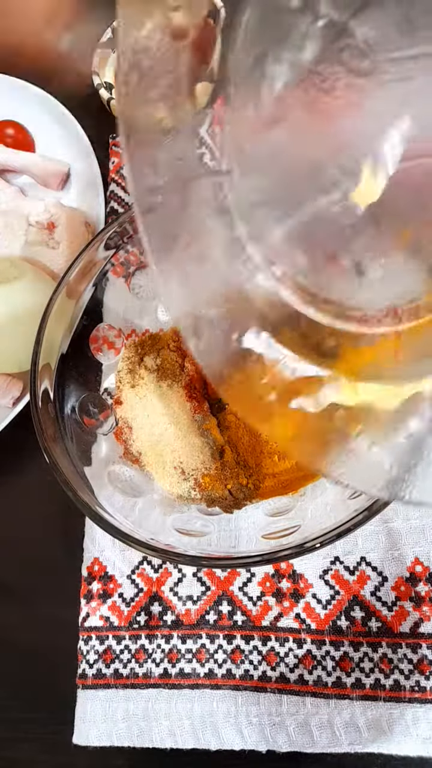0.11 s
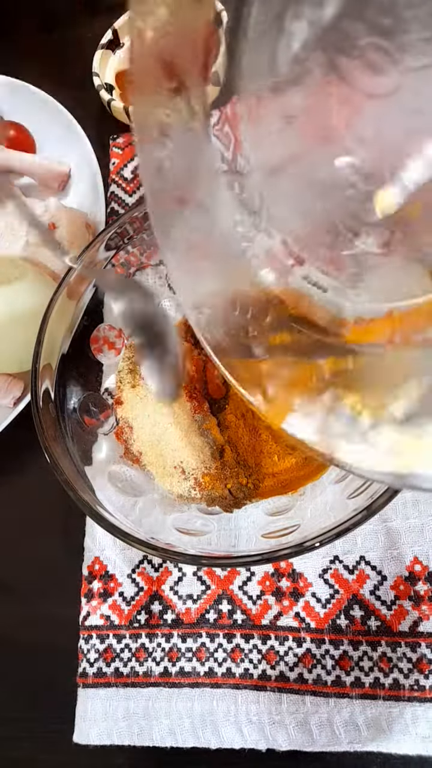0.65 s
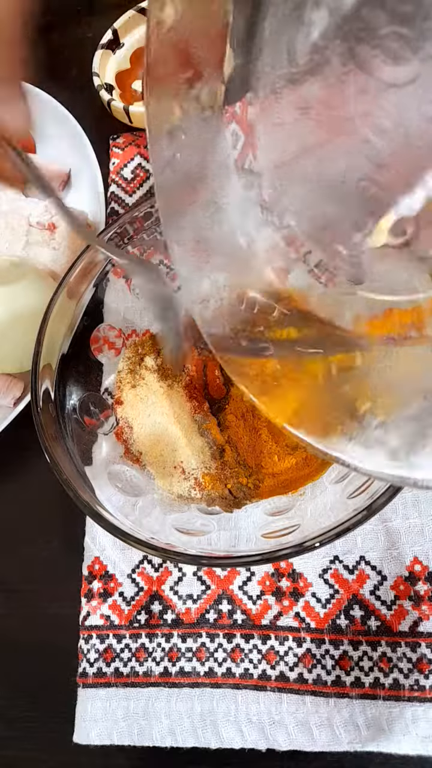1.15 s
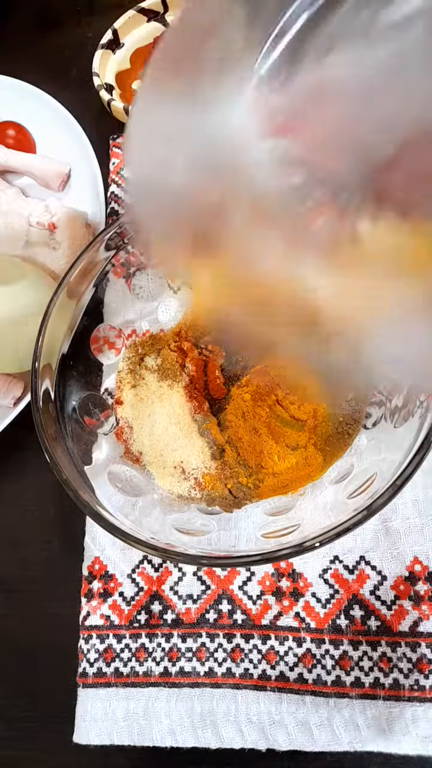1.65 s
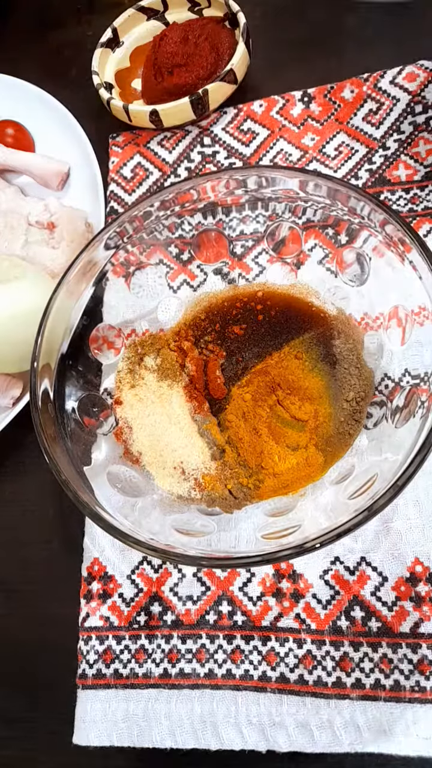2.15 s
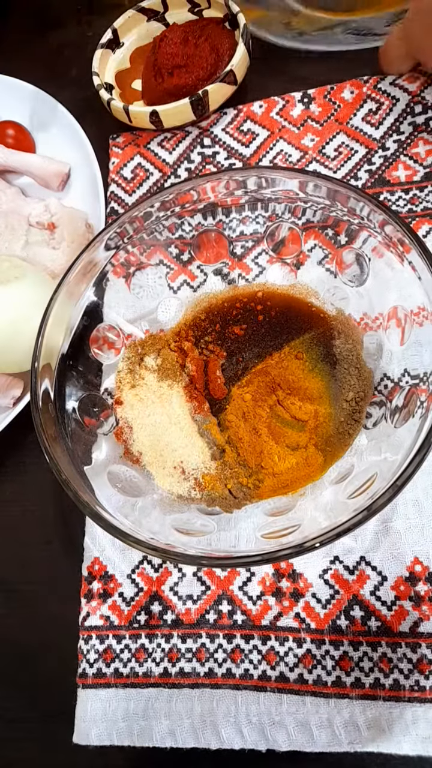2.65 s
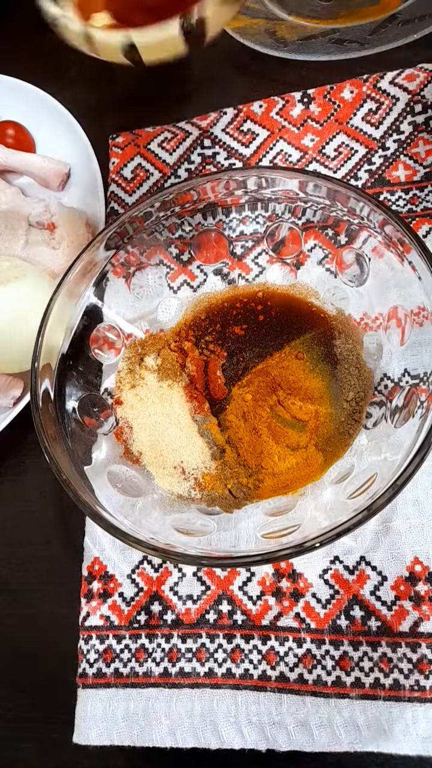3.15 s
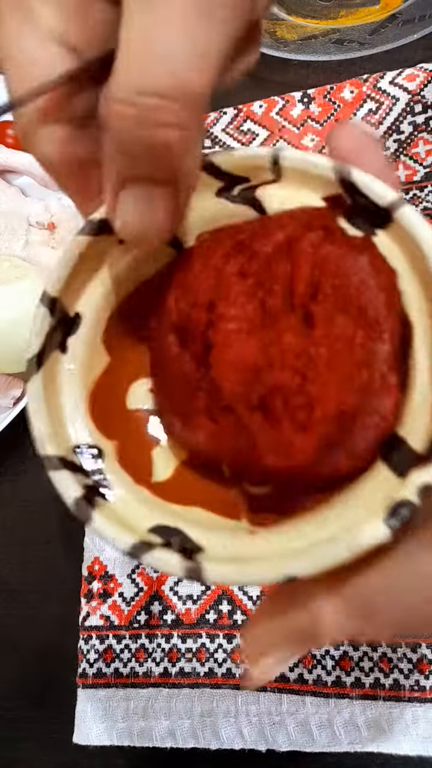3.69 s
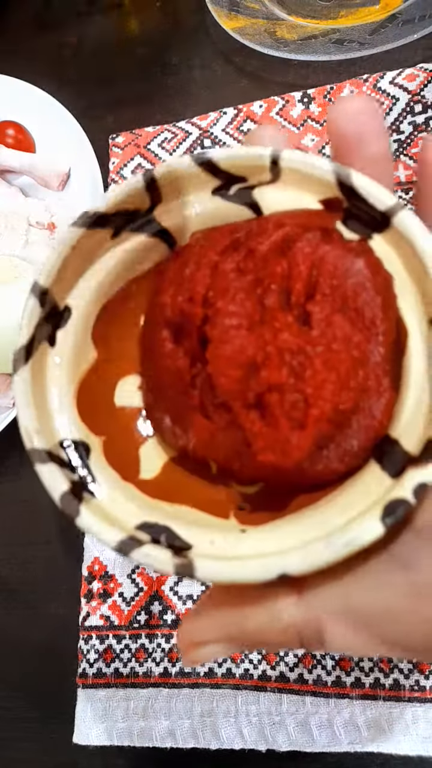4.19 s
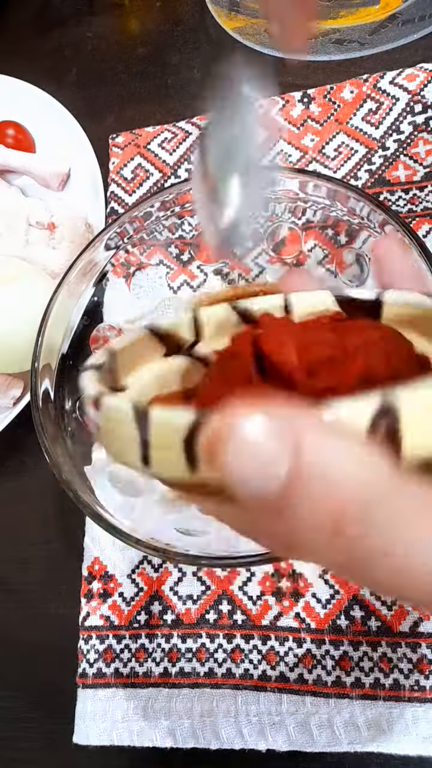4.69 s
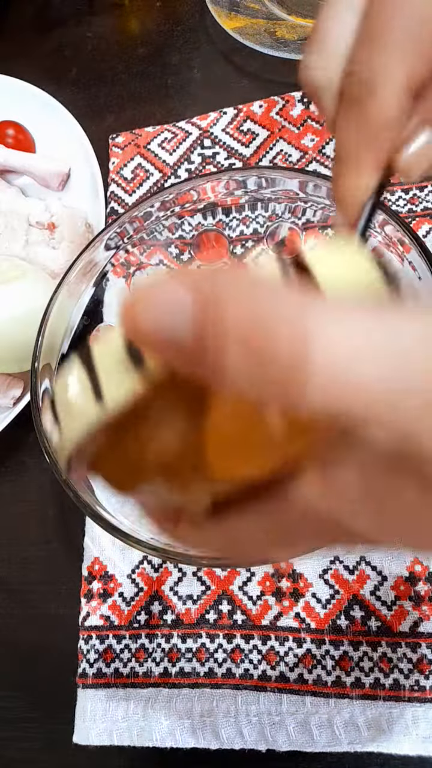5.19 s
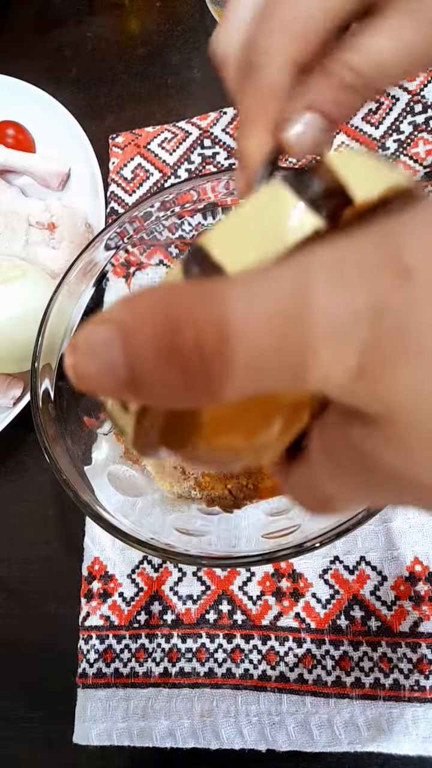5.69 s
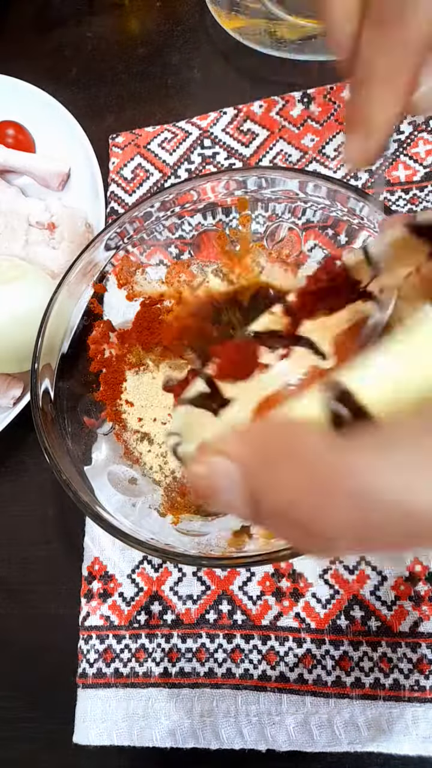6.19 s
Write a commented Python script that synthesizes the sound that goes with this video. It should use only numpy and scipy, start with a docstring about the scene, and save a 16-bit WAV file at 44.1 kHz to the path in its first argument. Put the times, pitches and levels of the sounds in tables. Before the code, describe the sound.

Very close to a phone microphone, a metal spoon strikes a held glass bowl in loud, irregular, bright clinks with steely cracks and small puffs of air. The bowl then lands and rocks on a wooden table with dull knocks and a thin glassy ring. After a near-silent pause, the spoon knocks, ticks and scrapes softly on a small glazed dish, ending with a quick cluster of harder knocks. A hard-walled kitchen answers briefly.

```python
"""A steel spoon taps a hand-held glass bowl close to a phone, the bowl is set down rocking on a wooden table,
then the spoon scrapes and knocks a small glazed dish. Each blow is a bank of decaying sines plus a noise crack,
answered by the noise tail of a hard-walled kitchen. Filtered noise makes the scrape, the ticks, a faint low
rumble, a narrow whine and the hiss; sines make the long free rings and the low puffs of air."""
import sys
import numpy as np
from scipy import signal
from scipy.fft import rfft, irfft, next_fast_len
from scipy.io import wavfile
from scipy.ndimage import uniform_filter1d

SR = 44100
rng = np.random.default_rng(int(sys.argv[2]) if len(sys.argv) > 2 else 0)


def materialize(psi):
    """Save the field psi as 16-bit PCM at rate SR to the path in sys.argv[1].

    A 1-D psi becomes a single channel; in a 2-D psi each row is a channel.
    """
    bounded = np.clip(np.atleast_2d(psi).T, -1, 1)
    quanta = np.round(bounded * 32767).astype(np.int16)
    wavfile.write(sys.argv[1], SR, quanta)


def natural_amplitude(level_db):
    """Convert a level in decibels to a linear amplitude factor, elementwise."""
    exponent = np.asarray(level_db, float) / 20
    return 10 ** exponent


N = 279153
LEAD = SR // 4  # samples that each track starts early, for sounds begun before time zero

# contact noise of steel on a hard surface, relative spectrum: freq_hz, density_db (dB per Hz)
CRACK = [(90, -38.5), (200, -15.5), (1100, 3), (2300, -6), (3700, -7.5), (6000, -4), (16000, -23)]
# glass modes that the grip hardly damps: pitch_hz, level_db (relative)
GLASS_FREE = [(2045, -27), (3187, -24.5), (4260, -32), (4868, -32), (5470, -31.5), (6065, -31.5),
              (7266, -25)]
# dish modes, before damping and weighting: pitch_hz, width_hz, level_db (relative)
DISH = [(1635, 90, -1.75), (1810, 120, 0.8), (2534, 41, -8), (3200, 100, -15), (4360, 90, 1),
        (5500, 47, -10.5), (7450, 51, -2.5), (9206, 55, -14), (11600, 42, -16), (12800, 45, -17.5)]


def unit(x):
    """Bring to rms 1."""
    return x / np.sqrt(np.mean(x ** 2) + 1e-20)


def along(points, hz):
    """Read (Hz, value) points on a log frequency axis."""
    f, v = np.transpose(points)
    return np.interp(np.log(hz + 1), np.log(f + 1), v)


def curve(rows, column=1):
    """Draw one column of timed levels as one dB value per sample, -120 dB outside the rows."""
    rows = np.array(rows)
    return np.interp(np.arange(N) / SR, rows[:, 0], rows[:, column], left=-120, right=-120)


def filtered(x, response):
    """Multiply the spectrum of x by a response of frequency."""
    n = x.shape[-1]
    m = next_fast_len(n + 4096)
    return irfft(rfft(x, m) * response(np.fft.rfftfreq(m, 1 / SR)), m)[..., :n]


def causal(x, colour_db):
    """Pass x through a minimum-phase filter, so nothing sounds before the blow."""
    n = x.shape[-1]
    m = 2 * next_fast_len(n)
    response_db = np.maximum(colour_db(np.fft.rfftfreq(m, 1 / SR)), -90)
    cepstrum = irfft(np.log(natural_amplitude(response_db)), m)
    # folding the cepstrum onto positive time gives minimum phase
    cepstrum[1:m // 2] *= 2
    cepstrum[m // 2 + 1:] = 0
    return irfft(rfft(x, m) * np.exp(rfft(cepstrum)), m)[..., :n]


def paired(two, alike):
    """Mix two unrelated signals to left and right with a given likeness per frequency."""
    def mid_side_gains(hz):
        angle = np.arccos(np.clip(along(alike, hz), 0, 1)) / 2
        return np.array([np.cos(angle), np.sin(angle)])

    mid, side = filtered(two, mid_side_gains)
    return np.array([mid + side, mid - side])


def add(track, s, sound):
    """Lay a stereo sound, starting 0.6 ms after its listed time, on a track that starts LEAD samples early."""
    part = track[:, LEAD + round((s + .0006) * SR):][:, :sound.shape[1]]
    part += sound[:, :part.shape[1]]


def singing(modes, t, t60, spot, wander):
    """Thin lines under the blow whose phase wanders at random, slightly widening each pitch."""
    hz, level = np.transpose(modes)[:, :, None]
    chance_db = 2 * rng.standard_normal((2, len(hz), 1))  # each port catches its own share
    phase = wander * np.cumsum(rng.standard_normal((len(hz), len(t))), axis=1)
    lines = natural_amplitude(level + spot(hz) + chance_db - 60 * t / t60) * np.sin(2 * np.pi * hz * t + phase)
    return lines.sum(1)


def blows(events, modes, free, contact, crack_db, crack_t60, crack_room_db, damping,
          free_db, free_t60, favour_db, pan_db, lag, wander):
    """Each blow rings damped modes at new strengths, cracks, and wakes the room."""
    shade_db, shade_hz = 7, 6000  # the phone's body hides the right port: dB per octave, well above shade_hz
    track, direct = np.zeros((2, 2, LEAD + N))
    t = np.arange(SR // 2) / SR
    hz, width, level = np.transpose(modes)[:, :, None]
    decay = np.exp(-np.pi * width * damping * t)
    swell = 1 - np.exp(-t / 0.0013)  # the blow takes a moment to spread through the wall
    for s, db, tilt_db, spot_hz, room_db in events:
        def spot(f):
            favoured = np.exp(-(np.log2(f / spot_hz) / 0.14) ** 2)
            return tilt_db * np.log2(f / 3000) + favour_db * favoured

        def crack_colour(f):
            return along(contact, f) + tilt_db * np.log2(f / 3000 + 0.0048)

        chance_db = 1.8 * rng.standard_normal((3, len(hz), 1))  # strength, then what each port catches
        rings = width * natural_amplitude(level + spot(hz) + chance_db[0]) * decay * np.sin(2 * np.pi * hz * t)
        ring = (natural_amplitude(chance_db[1:]) * rings).sum(1) * swell
        free_ring = natural_amplitude(free_db) * swell * singing(free, t, free_t60, spot, wander)
        ring = ring / np.abs(ring).max() + free_ring

        burst = natural_amplitude(-60 * t / crack_t60) * (1 - np.exp(-t / 0.0001)) * rng.standard_normal(len(t))
        crack = causal(burst, crack_colour)
        crack *= natural_amplitude(crack_db) / np.abs(crack).max()

        near = natural_amplitude(db) * (ring + crack)
        sent = natural_amplitude(db) * (ring.mean(0) + natural_amplitude(crack_room_db) * crack)  # the room gets less of the crack
        add(track, s, natural_amplitude(room_db) * signal.fftconvolve(sent[None], kitchen(), axes=1))
        near[1] = np.pad(near[1], (lag, 0))[:len(t)]  # the left port is nearer
        add(direct, s, near * natural_amplitude([[pan_db / 2], [-pan_db / 2]]))
    direct[1] = causal(direct[1], lambda f: -shade_db * np.log2(1 + (f / shade_hz) ** 2) / 2)
    return (track + direct)[:, LEAD:]


def glass_taps():
    """The spoon strikes the held bowl: bright glass modes, damped by the grip, under a steel crack."""
    # spoon on glass: start_s, level_db, tilt_db (per octave), favoured_hz (by the spot struck), room_db
    tap_rows = [(-0.1, -10, 0.5, 3300, 2.5), (0.1607, -2, 0.5, 2970, -14), (0.1645, -3.5, 2.5, 6040, -17),
                (0.2278, -1.5, -0.5, 2850, -8), (0.2727, -5, -1, 6160, -16.5), (0.4797, -2.5, 0, 7600, -6),
                (0.7561, -4.5, -1.5, 4410, -9), (1.0235, -14, -5, 3700, -10), (1.3013, -3.5, 3, 6040, -0.5),
                (2.468, -24.5, -5.5, 3200, -5.5), (2.574, -7.5, -7, 5460, -9.5)]
    # glass modes, before damping and weighting: pitch_hz, width_hz, level_db (relative)
    glass_modes = [(1970, 140, -22.5), (3107, 46, -8), (3205, 35, -8.5), (4270, 59, -18.5),
                   (4880, 66, -4.5), (5460, 43, -13.5), (6040, 150, -11), (7276, 83, -6), (8147, 48, -15.5),
                   (8660, 30, -21), (10416, 83, -15.5), (11960, 77, -21), (13430, 95, -13),
                   (14740, 73, -20), (15700, 220, -29.5)]
    # times (t60) in seconds, pan left over right in dB, lag of the right port in samples
    return blows(tap_rows, glass_modes, GLASS_FREE, CRACK,
                 crack_db=-3, crack_t60=0.014, crack_room_db=-4, damping=1.4,
                 free_db=-9, free_t60=0.4, favour_db=6.5, pan_db=5.5, lag=14, wander=.028)


def table_landings():
    """The bowl lands and rocks: low wooden modes and a dull thud, with the glass singing thinly."""
    # glass on table: start_s, level_db, tilt_db (per octave), favoured_hz (by the spot struck), room_db
    landing_rows = [(2.383, -32, 6, 2320, -1.5), (2.436, -4.5, 4.5, 390, -3),
                    (2.478, -16.5, -3.5, 433, -2.5), (2.514, -27, 5, 397, 5),
                    (2.575, -20.5, 13.5, 405, 4.5), (2.6, -19.5, 2.5, 305, -2), (2.767, -5.5, 5, 1176, -5),
                    (2.779, -13, 1.5, 660, -1.5), (2.789, -14, -9, 398, -2)]
    # table modes, before damping and weighting: pitch_hz, width_hz, level_db (relative)
    table_modes = [(305, 8.3, -9), (405, 38, -5), (431.7, 30, -10), (664, 34, -9.5), (712, 25, -8.5),
                   (790, 15, -13), (1045, 30, -9), (1142, 26, -14), (1204, 18, -15.5), (2133, 77, -12),
                   (2975, 360, -18.5), (5500, 110, -27), (6700, 160, -38.5)]
    # dense boards, too many modes to tell apart, relative spectrum: freq_hz, density_db (dB per Hz)
    thud_colour = [(65, -60), (110, -21.5), (409, -4), (536, -10), (646, 1.5), (1180, -3.5), (5650, -34),
                   (12700, -52), (16000, -71)]
    return blows(landing_rows, table_modes, GLASS_FREE, thud_colour,
                 crack_db=3.5, crack_t60=0.016, crack_room_db=-0.7, damping=1.5,
                 free_db=-17.0, free_t60=0.25, favour_db=13.5, pan_db=-3, lag=12, wander=.035)


def dish_knocks():
    """The spoon knocks the glazed dish, whose modes die fast because one hand cups it."""
    # spoon on glaze: start_s, level_db, tilt_db (per octave), favoured_hz (by the spot struck), room_db
    knock_rows = [(4.9081, -6, 4, 4340, -5.5), (5.1032, -17, 2.1, 1556, -5.5),
                  (5.1692, -28, -0.7, 7500, -2.5), (5.4968, -24, -1.5, 1910, 1),
                  (5.521, -27.5, 2, 1810, 4.5), (5.5327, -14.5, 1.4, 1560, -9.5),
                  (5.5731, -24, -2.5, 1830, -16.5), (6.1688, -11.5, 5.5, 5500, -5.5),
                  (6.2025, -24, -0.5, 5500, 6), (6.2582, -13.5, -5.3, 4340, -13),
                  (6.2699, -4.5, 4, 7600, -6), (6.3008, -5, 4, 4340, -8.5)]
    # dish modes that the hand hardly damps: pitch_hz, level_db (relative)
    dish_free = [(1700, -24), (4342, -20.5), (7560, -30)]
    return blows(knock_rows, DISH, dish_free, CRACK,
                 crack_db=-0.5, crack_t60=0.012, crack_room_db=-0.5, damping=1.8,
                 free_db=-2.0, free_t60=0.18, favour_db=4.5, pan_db=1, lag=4, wander=.012)


def scrape():
    """Tiny uneven catches of steel on glaze, ringing the dish."""
    # spoon sliding: time_s, level_db (relative)
    slide_levels = [(4.95, -114), (5.12, -45.5), (5.3, -68), (5.45, -58.5), (5.6, -42.5), (5.71, -68),
                    (5.74, -50.5), (5.8, -90.5), (6.15, -95), (6.22, -52), (6.33, -65)]
    catches = rng.random((2, N)) < 700 / SR  # about 700 a second
    grains = catches * rng.standard_normal((2, N)) * natural_amplitude(2 * rng.standard_normal((2, N)))
    grains = grains + 0.035 * rng.standard_normal((2, N))

    def body(f):
        response = 0
        for k, (centre, width, db) in enumerate(DISH):
            wide = 3 * width  # broader resonances than the knocks
            resonance = 1j * f * wide / (centre * centre - f * f + 1j * f * wide)
            response = response + (-1) ** k * natural_amplitude(0.97 * db) * resonance
        return response

    return natural_amplitude(curve(slide_levels)) * unit(paired(filtered(grains, body), [(1000, 0.26)]))


def ticks():
    """Spoon ticks that hardly ring: short noise round one pitch, broader when harder, with some room."""
    # dry ticks: start_s, peak_db, centre_hz
    tick_rows = [(.4965, -58, 920), (5.139, -34, 6070), (5.156, -33, 7000), (5.191, -28, 5160),
                 (5.31, -38.5, 4000), (5.331, -35, 6650), (5.349, -37.5, 4600), (5.408, -48, 1200),
                 (5.429, -39.5, 1620), (5.443, -44, 2000), (5.726, -34.5, 1310), (5.733, -33, 7030),
                 (5.835, -35, 3750), (6.212, -21, 2360)]
    track, t = np.zeros((2, LEAD + N)), np.arange(SR // 20) / SR
    for s, db, hz in tick_rows:
        burst = natural_amplitude(-60 * t / 0.021) * rng.standard_normal(len(t))
        tick = causal(burst, lambda f: 0.3 * db * np.log2(f / hz + 0.011) ** 2)
        tick *= natural_amplitude(db) / np.abs(tick).max()
        add(track, s, np.array([tick, tick]))
        add(track, s, natural_amplitude(-6.0) * signal.fftconvolve(tick[None], kitchen(), axes=1))
    return track[:, LEAD:]


def lingering():
    """Lightly damped modes that sing on, a little unsteady, until a touch stops them."""
    # long free rings: start_s, end_s, pitch_hz, level_db (at the start), t60_s
    ring_rows = [(-.05, 0.754, 2050, -43.5, 2.7), (2.455, 3.24, 143, -33.5, 1.7),
                 (2.586, 2.788, 2410, -38, 9), (2.742, 2.79, 400, -23.5, 3.3)]
    track, t = np.zeros((2, LEAD + N)), np.arange(SR) / SR
    for s, end, hz, db, t60 in ring_rows:
        drift = .000011 * hz * np.cumsum(rng.standard_normal(SR)) + rng.normal(0, 0.32, (2, 1))
        gate = (1 - np.exp(-t / 0.01)) * np.clip((end - s - t) / 0.042, 0, 1)
        add(track, s, natural_amplitude(db - 60 * t / t60) * gate * np.sin(2 * np.pi * hz * t + drift))
    return track[:, LEAD:]


def puffs():
    """The jolted hand pushes air at the nearer, left port: a few swings that slow down."""
    # puffs of air: start_s, level_db (before the envelope), first_swing_hz
    puff_rows = [(0.165, -15.5, 90), (0.236, -21, 94), (0.483, -1.5, 85), (1.301, -6, 84.3),
                 (4.913, -26, 84.2), (6.271, -5.5, 102.9)]
    track, t = np.zeros((2, LEAD + N)), np.arange(SR // 4) / SR
    for s, db, hz in puff_rows:
        envelope = np.exp(-t / 0.0059) * (1 - np.exp(-t / 0.0022))
        swing = np.sin(2 * np.pi * hz * t / (1 + 11 * t)) * envelope
        add(track, s, natural_amplitude([[db], [db - 18]]) * swing)
    return track[:, LEAD:]


def kitchen():
    """A fresh echo tail from hard walls: noise in which each frequency dies at its own speed."""
    # decay time of the room: freq_hz, t60_s
    wall_decay = [(100, 0.71), (800, 0.52), (2000, 0.6), (5000, 0.5), (13000, 0.38)]
    # stereo width of the tail: freq_hz, likeness (left to right, 0 to 1)
    wall_likeness = [(100, 0.86), (400, 0.77), (900, 0.36), (3000, .05)]
    hz, t, z = signal.stft(rng.standard_normal((2, SR * 3 // 4)), SR, nperseg=256)
    tail = signal.istft(z * natural_amplitude(-60 * t / along(wall_decay, hz)[:, None]), SR, nperseg=256)[1]
    tail = paired(tail, wall_likeness)
    # the first walls are some metres away
    tail *= 1 - np.exp(-(np.arange(tail.shape[1]) / SR / 0.0056) ** 2)
    return tail / np.linalg.norm(tail[0])


def rumble_and_whine():
    """Faint low rumble of air and handling in soft patches, with a narrow wavering whine."""
    # background levels: time_s, rumble_db (rms), whine_db (rms)
    background_levels = [(0, -59, -85), (1.3, -61.5, -77), (1.65, -56.5, -86.5), (1.95, -72, -75),
                         (2.35, -62, -85.5), (3.3, -65, -70.5), (3.5, -69, -79), (3.8, -68.5, -72),
                         (4.35, -65.5, -72.5), (4.85, -64.5, -67), (5.1, -51.5, -73), (5.4, -60.5, -74.5),
                         (6.33, -63.5, -70.5)]
    # relative spectrum of the rumble: freq_hz, density_db (dB per Hz)
    rumble_colour = [(18, -40.5), (30, -12), (92, -6.5), (167, -12.5), (234, -9), (293, -2.5), (387, -8.5),
                     (542, -7), (1210, -25.5), (1690, -15), (2600, -23), (3380, -56), (5720, -120)]
    # stereo width of the rumble: freq_hz, likeness (left to right; below 0 acts as 0)
    rumble_likeness = [(60, 0.21), (240, 0.33), (950, 0.96), (3770, -0.1), (15000, -0.01)]
    z = signal.stft(rng.standard_normal((2, N + 512)), nperseg=512)[2]
    # soft patches: a random gain smoothed over frequency, then time
    field = uniform_filter1d(rng.standard_normal(z.shape[1:]), size=5, axis=0)
    field = uniform_filter1d(field, size=14, axis=1)
    noise = signal.istft(z * natural_amplitude(4.7 * unit(field)), nperseg=512)[1][:, :N]
    coloured = filtered(noise, lambda hz: natural_amplitude(along(rumble_colour, hz)))
    rumble = unit(paired(coloured, rumble_likeness))
    whine = filtered(rng.standard_normal((2, N)), lambda f: 1 / (1 + ((f - 1705) / 45) ** 2))
    whine = unit(paired(whine, [(1700, 0.25)]))
    return natural_amplitude(curve(background_levels)) * rumble + natural_amplitude(curve(background_levels, column=2)) * whine


def hiss():
    """The microphones' own steady noise."""
    # relative spectrum of the noise: freq_hz, density_db (dB per Hz)
    hiss_colour = [(400, -27), (1500, 0.5), (6000, -2.5), (16000, -1.5)]
    noise = rng.standard_normal((2, N))
    return natural_amplitude(-70.0) * unit(filtered(noise, lambda hz: natural_amplitude(along(hiss_colour, hz))))


def scene():
    """All sources together."""
    struck = glass_taps() + table_landings() + dish_knocks() + ticks()
    return struck + lingering() + puffs() + scrape() + rumble_and_whine() + hiss()


def roll_off(x):
    """The treble ends steeply here."""
    return signal.sosfilt(signal.butter(12, 16690, fs=SR, output="sos"), x)


def record(dry):
    """The phone's ports colour the sound and loud peaks round off just below full scale."""
    # response of the phone's ports: freq_hz, gain_db
    port_response = [(20, -18.5), (60, 0), (7500, -2.5), (8900, -10), (10500, -2.5), (14500, -5),
                     (16500, -12)]
    heard = causal(dry, lambda hz: along(port_response, hz))
    rounded = heard / (1 + np.abs(heard / .97) ** 6) ** (1 / 6)
    return roll_off(rounded)


dry = scene()
out = record(dry)
materialize(out)
```